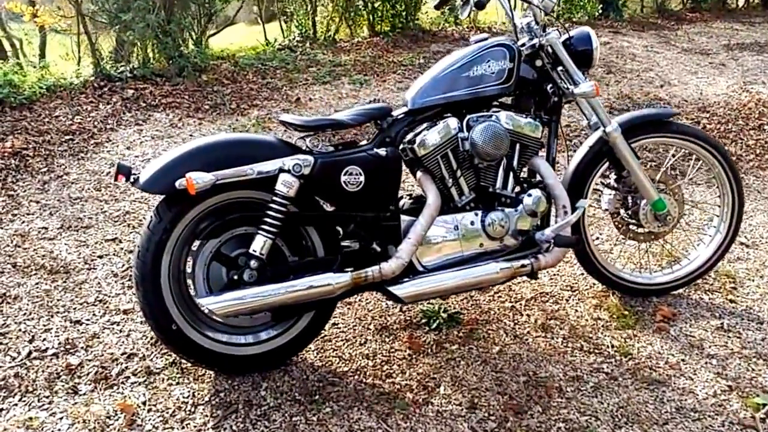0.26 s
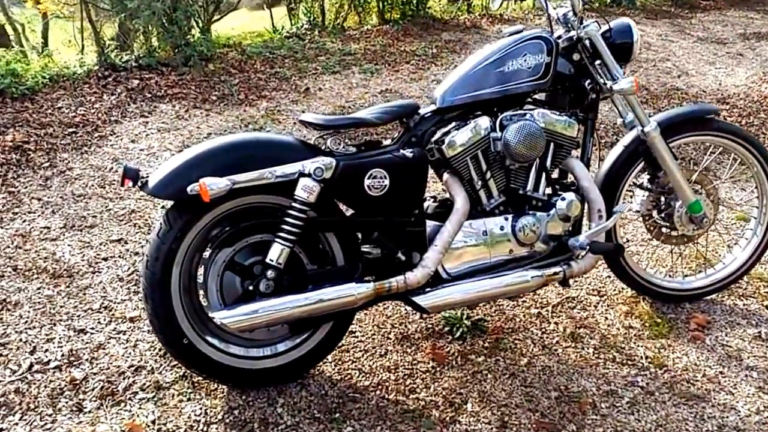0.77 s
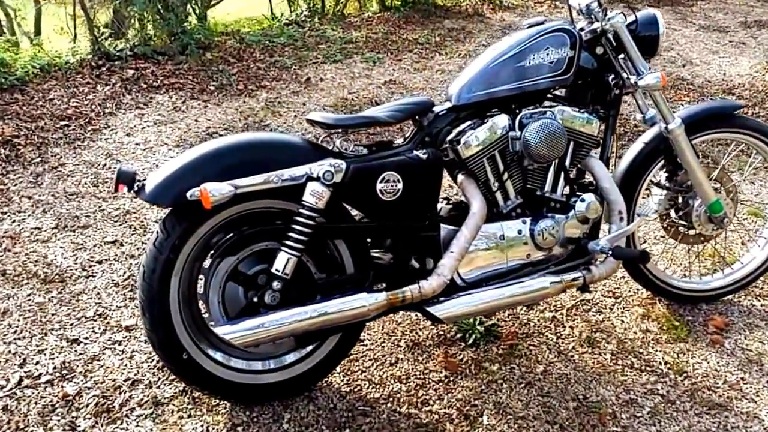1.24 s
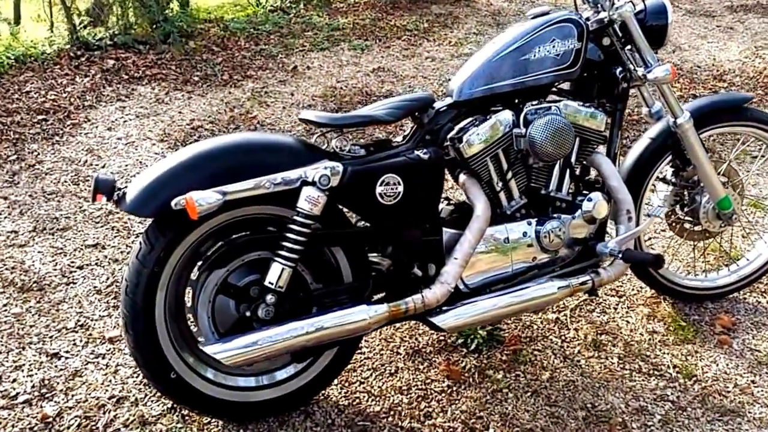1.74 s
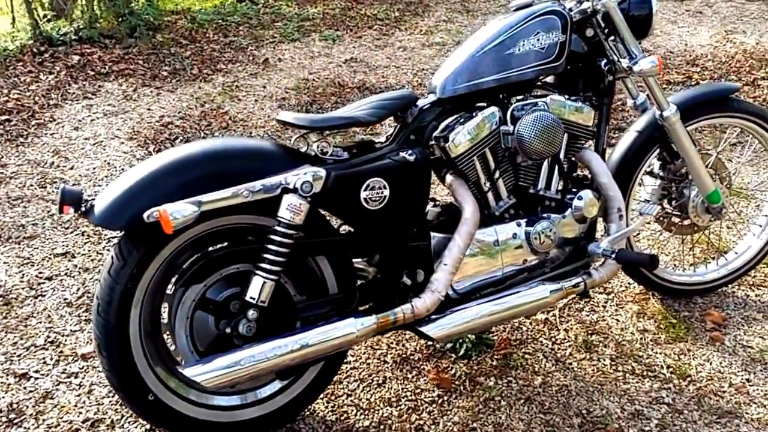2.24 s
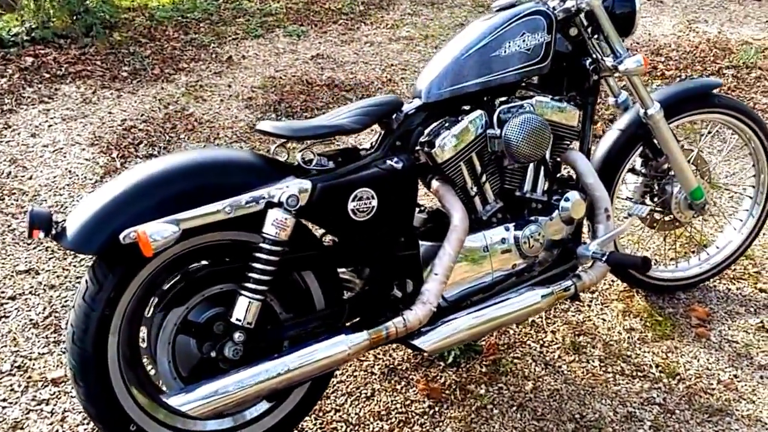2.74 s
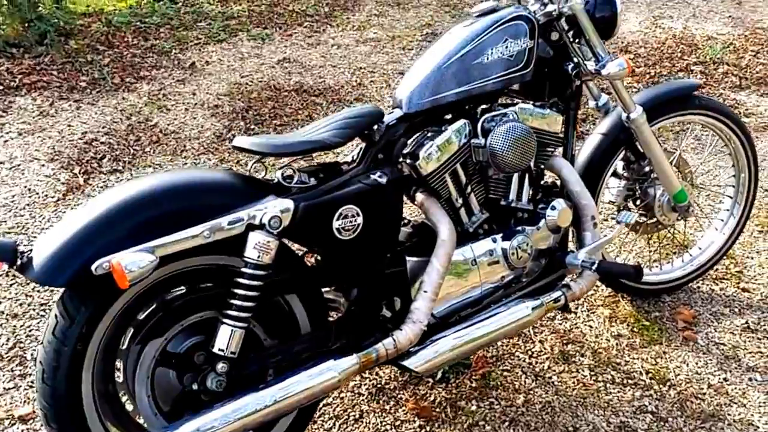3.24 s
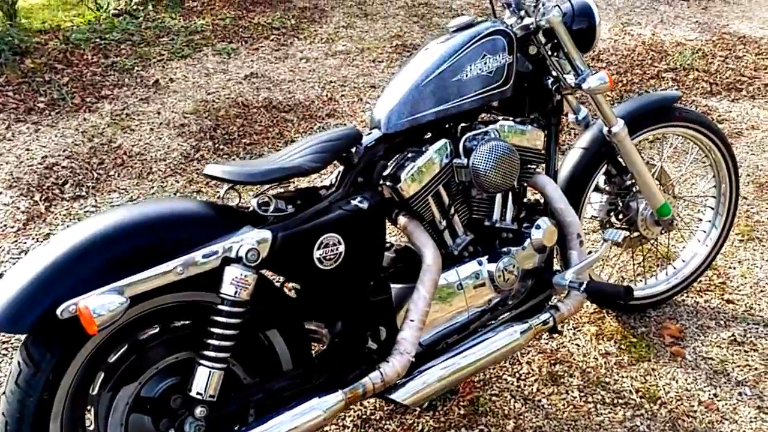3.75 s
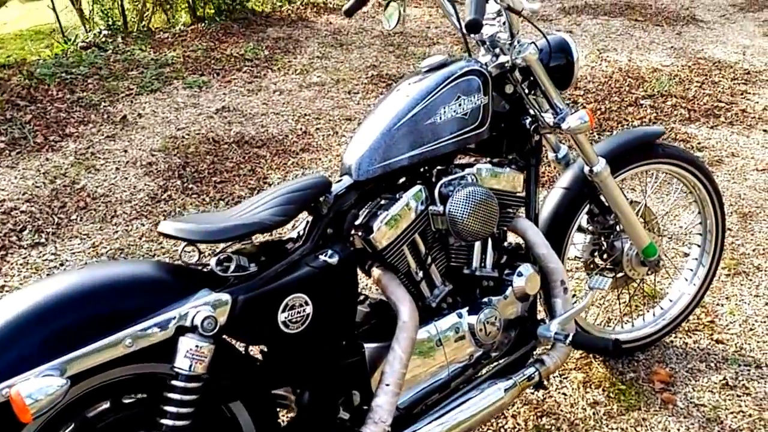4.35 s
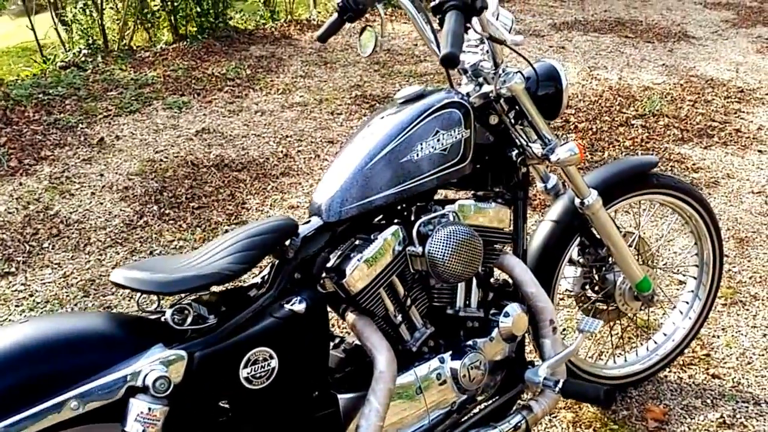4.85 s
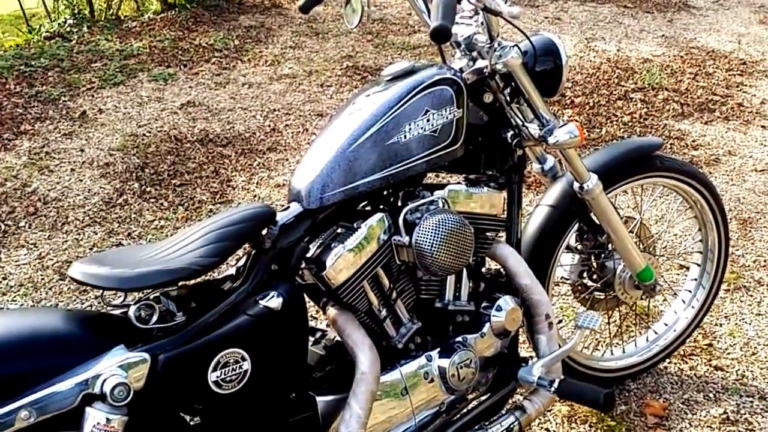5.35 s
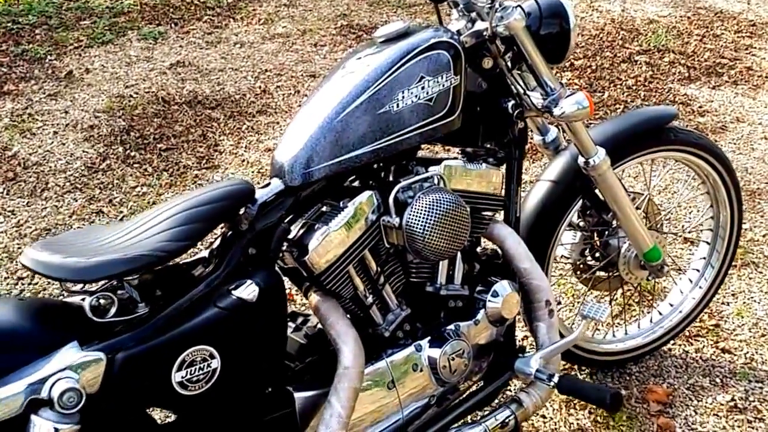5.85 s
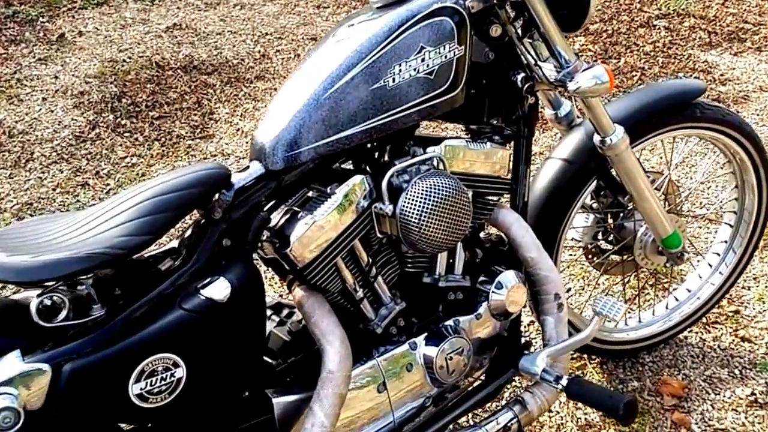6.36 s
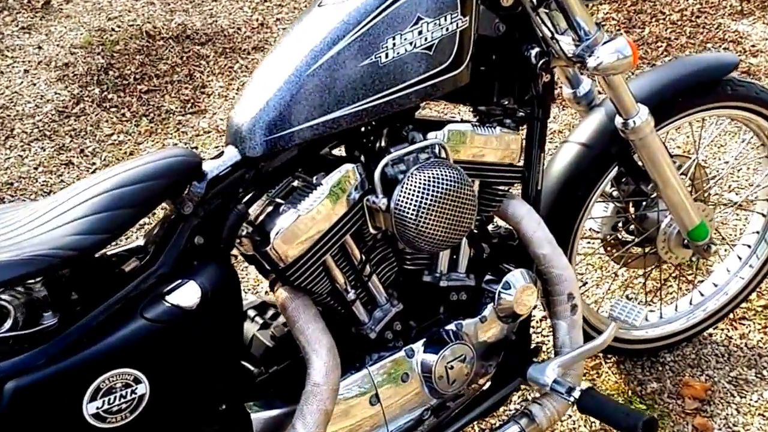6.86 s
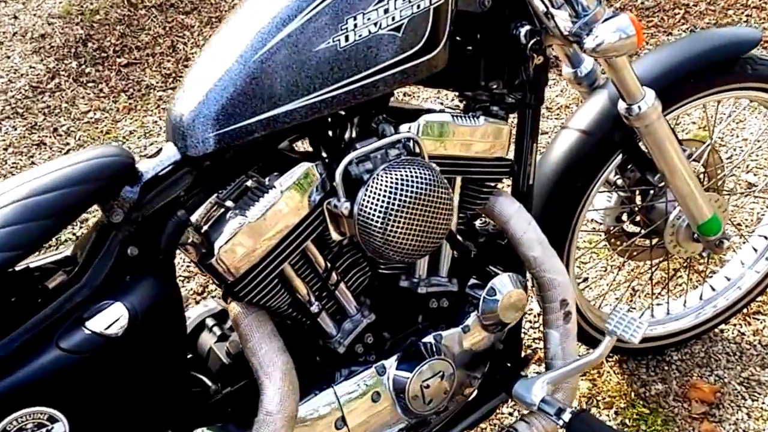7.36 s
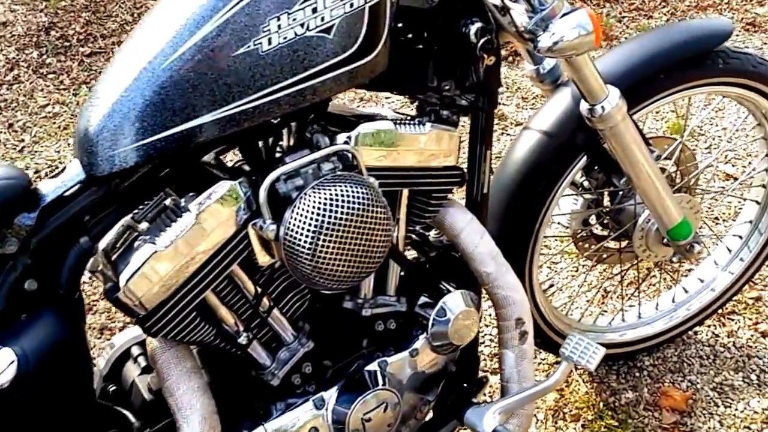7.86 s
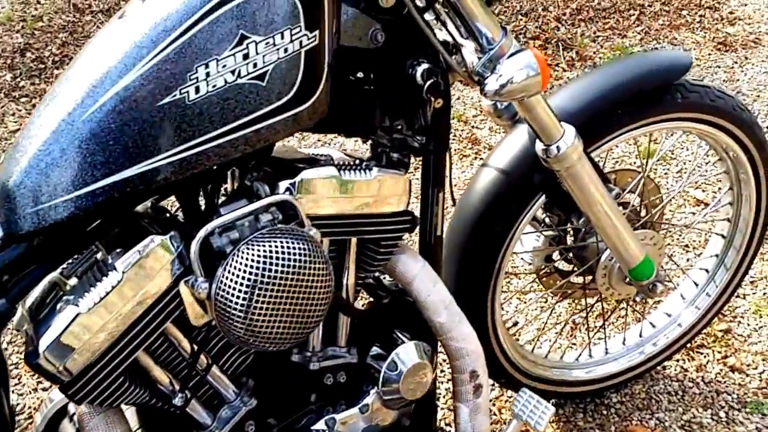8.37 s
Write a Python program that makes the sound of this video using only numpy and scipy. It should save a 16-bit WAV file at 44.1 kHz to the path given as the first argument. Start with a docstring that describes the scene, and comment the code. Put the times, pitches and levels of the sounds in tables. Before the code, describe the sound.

A V-twin motorcycle idles outdoors for the whole eight and a half seconds, with a deep, uneven, loping beat. Strong firings come singly or in clusters of two or three, with weak puffs and a low rolling rumble between them. At first the sound is heard from behind the tailpipes, where each strong thump carries a throaty bark and a short, bright spit of hiss. Valves tick and gears whirr quietly between the beats, with a faint whine. The listener moves forward, and from about 3 seconds light metallic pings emerge, clearer by 5 seconds. Between about 6 and 8 seconds the exhaust hiss falls away and the thumps turn rounder, while the engine's whirr and sizzle come close, strongest around 8 seconds. The idle speed holds to the end. Throughout, the left microphone is muffled and the biggest beats overload the right one.

```python
"""A V-twin motorcycle idles with an uneven, loping beat, heard first from behind the tailpipes.
Every firing thumps the air in the pipes; strong ones bark and spit a hissing jet, weak ones barely puff.
Valve gear ticks and whirrs between the beats. As the listener walks forward the rockers start to ping,
then the jets fall away and the engine's whirr and sizzle come close.
Throughout, the left microphone is muffled and the big beats overload the right one."""
import sys
import numpy as np
from scipy import signal
from scipy.fft import rfft, irfft, next_fast_len
from scipy.io import wavfile
from scipy.ndimage import uniform_filter1d, map_coordinates

SR = 44100
rng = np.random.default_rng(int(sys.argv[2]) if len(sys.argv) > 2 else 0)


def master_out(mix):
    """Clip the mix to full scale and print it as 16-bit PCM to the path in sys.argv[1]."""
    frames = np.transpose(np.atleast_2d(mix))
    ceiling = np.clip(frames, -1, 1)
    pcm = np.round(ceiling * 32767).astype(np.int16)
    wavfile.write(sys.argv[1], SR, pcm)


N = 379701


def amp(db):
    """Decibels to gain."""
    return 10 ** (np.asarray(db) / 20)


def unit(x):
    """x scaled to rms 1."""
    return x / np.sqrt(np.mean(x ** 2) + 1e-20)


def eq_gain(points, hz):
    """Gain at hz of an EQ curve drawn through (frequency [Hz], level [dB]) on a log axis."""
    point_hz, db = np.transpose(points)
    return amp(np.interp(np.log(hz + 1), np.log(point_hz + 1), db))


def curves(rows):
    """Automation lanes: one value per sample for each column after the time."""
    times, *columns = np.transpose(rows)
    return [np.interp(np.arange(N) / SR, times, column) for column in columns]


def wobble(rate):
    """A smooth random curve, rate knots a second."""
    knots = rng.standard_normal(int(N * rate / SR) + 4)
    return map_coordinates(knots, [np.arange(N) * rate / SR])


def filtered(x, response):
    """x through a filter given as a complex response of frequency."""
    size = next_fast_len(N + SR // 2)
    return irfft(rfft(x, size) * response(np.fft.rfftfreq(size, 1 / SR)), size)[..., :N]


def resonances(modes, f):
    """Response of a row of modes, neighbours swinging in opposite senses."""
    return sum(-(-1) ** k * amp(db) * 1j * f * width / (hz * hz - f * f + 1j * f * width)
               for k, (hz, width, db) in enumerate(modes))


def strikes(times, sizes, shape):
    """One copy of shape at each time; a strike just before the start rings on into it."""
    train = np.zeros(N + 2 * SR)
    np.add.at(train, np.round(times * SR).astype(int) + SR, sizes)
    return signal.fftconvolve(train, shape)[SR:SR + N]


def puff(at, width):
    """A bell-shaped envelope centred `at` seconds after its trigger."""
    t = np.arange(SR // 4) / SR
    return np.exp(-.5 * ((t - at) / width) ** 2)


def fade(at, rise, t60):
    """An envelope that opens `at` seconds after its trigger and dies away."""
    t = np.maximum(np.arange(SR // 4) / SR - at, 0)
    return (1 - np.exp(-t / rise)) * amp(-60 * t / t60)


def rush(colour, alike, patchy_db):
    """Stereo turbulence of rms 1 whose colour flickers by patchy_db; alike is left-right correlation."""
    spectra = signal.stft(rng.standard_normal((2, N)), nperseg=512)[2]
    patches = uniform_filter1d(rng.standard_normal(spectra.shape[1:]), size=7, axis=0)
    patches = unit(uniform_filter1d(patches, size=8, axis=1))
    noise = signal.istft(spectra * amp(patchy_db * patches), nperseg=512)[1][:, :N]
    mid, side = filtered(noise, colour)
    spread = np.arccos(alike) / 2
    return unit(np.cos(spread) * mid + np.sin(spread) * np.array([side, -side]))


def firings(turn_s=0.079, v_degrees=45, kick_s=0.00407, stall_db=1.66, chance_db=1, hiss_slope=1.76):
    """The cylinders fire in turn, weakly between beats. Returns (time [s], pressure [dB], hiss [dB])."""
    # firings that catch fully and stand out as beats: (time [s], pressure [dB])
    beats = [(-0.025, -5.5), (0.038, -9), (0.289, -3.5), (0.354, 0), (0.591, -1), (0.746, -4), (0.815, 1.5),
             (0.901, -1), (1.063, -2.5), (1.233, -1.5), (1.302, 1), (1.383, -1.5), (1.539, -2.5),
             (1.706, -1), (1.772, 2), (2.022, 1), (2.248, 1), (2.326, 0.5), (2.637, 0.5), (2.7, 1),
             (2.928, 0.5), (3.082, -2.5), (3.15, 2.5), (3.229, -3), (3.383, -3.5), (3.552, -1), (3.619, 2),
             (3.855, -1.5), (4.013, -3.5), (4.085, 0.5), (4.164, 1), (4.493, 2), (4.557, -0.5), (4.807, 0),
             (4.959, -5.5), (5.029, 1), (5.11, 0), (5.45, 2), (5.512, 0.5), (5.76, 1.5), (5.916, -1),
             (5.984, 3), (6.06, 1), (6.384, 0), (6.453, 4), (6.687, -0.5), (6.846, -0.5), (6.917, 2.5),
             (6.997, 0.5), (7.222, -3), (7.318, 1.5), (7.55, -1), (7.642, 1.5), (7.984, 1), (8.048, 2.5),
             (8.282, 0.5), (8.436, -2), (8.507, -0.5), (8.587, -2.5)]
    # a firing that barely catches: (time [s], pressure [dB])
    misfire = [(0, -24.5), (0.7, -13.5), (4.4, -14.5), (6.5, -8.5), (8.6, -15.5)]
    # each pipe's jet drops once the listener has passed its mouth: (time [s], relative hiss [dB])
    front_mouth = [(0, -13), (3.3, -14.5), (5.5, -14), (7.3, -16), (7.7, -20), (8.6, -30)]
    rear_mouth = [(0, -11.5), (3.6, -14), (5, -15), (6, -23.5), (7.5, -23.5), (8.05, -32), (8.6, -20.5)]
    beat_s, beat_db = np.transpose(beats)
    turns_apart = np.round(np.diff(beat_s) / turn_s)  # one firing per crank turn
    beat_turn = 1 + np.append(0, np.cumsum(turns_apart)).astype(int)
    turn = np.arange(1, beat_turn[-1] + 1)
    rear = turn % 2 == 0
    crank = turn - rear * v_degrees / 360  # the V angle makes the rear cylinder fire early
    times = np.interp(crank, crank[beat_turn - 1], beat_s)
    last_beat = np.searchsorted(beat_turn, turn, side="right") - 1
    turns_since = turn - beat_turn[last_beat]
    times -= kick_s * (turns_since == 1)  # a beat speeds the crank: the weak firing after it is early
    misfire_db = np.interp(times, *np.transpose(misfire))
    carry = np.where(rear, 0.48, 0.19)  # share of a cylinder's last strength that a weak firing keeps
    luck_db = chance_db * rng.standard_normal(len(times))
    pressure_db = beat_db[last_beat]
    for k in np.flatnonzero(turns_since):
        kept_db = carry[k] * (pressure_db[k - 2] - misfire_db[k]) if k >= 2 else 0
        lost_db = stall_db * (turns_since[k] - 1)
        pressure_db[k] = misfire_db[k] + kept_db - lost_db + luck_db[k]
    front_db = np.interp(times, *np.transpose(front_mouth))
    rear_db = np.interp(times, *np.transpose(rear_mouth))
    hiss_db = np.where(rear, rear_db, front_db) + hiss_slope * pressure_db
    return times, pressure_db, hiss_db


def thump(times, pressure_db, gain_db=58, low_cut_hz=30, deep_count=6):
    """Each slug of gas sets the air in the pipes swinging: deep modes, and overtones that beam."""
    # air columns of the exhaust: (frequency [Hz], width [Hz], level [dB])
    pipes = [(59.7, 18.13, -5), (78.8, 20.46, 0), (96.37, 8.5, 2), (105.5, 18.5, -12), (111.9, 4.2, -4.5),
             (155, 30.3, -28.5), (196.3, 27.2, -17), (218.4, 12, -13), (293.4, 33, -33.5), (375, 26, -77)]
    # the overtones beam backwards, so they fade as the listener walks forward: (time [s], level [dB])
    beam = [(0, 2), (2.5, -0.5), (5, -0.5), (7, -4), (8.6, -11)]
    beam_db, = curves(beam)
    f = np.fft.rfftfreq(SR, 1 / SR)
    radiated = (1j * f / (1j * f + low_cut_hz)) ** 2
    slugs = amp(pressure_db + gain_db)
    deep, overtones = [strikes(times, slugs, irfft(resonances(modes, f) * radiated)[:SR // 2])
                       for modes in (pipes[:deep_count], pipes[deep_count:])]
    return deep + amp(beam_db) * overtones


def bark(times, pressure_db, gain_db=-17, echo_db=-9, scatter_db=-11, steepness=1.74):
    """The exhaust valve cracks open; the crack returns down the pipe and scatters round the yard."""
    # throaty midrange of the crack: (frequency [Hz], level [dB])
    tone = [(200, -5.5), (330, 2.5), (480, -6), (620, 2), (850, 2.5), (1050, -6.5), (1350, -12),
            (2200, -14), (4000, -20.5)]
    crack = fade(at=0.0022, rise=0.00087, t60=0.09)
    echo = amp(echo_db) * puff(at=0.017, width=0.0047)
    scatter = amp(scatter_db) * fade(at=0.0078, rise=0.0031, t60=0.55)
    sizes = amp(steepness * pressure_db + gain_db)
    power = strikes(times, sizes ** 2, crack ** 2 + echo ** 2 + scatter ** 2)
    return np.sqrt(np.abs(power)) * rush(lambda f: eq_gain(tone, f), alike=0.22, patchy_db=2.37)


def jet(times, hiss_db, gain_db=4, after_db=-16, scatter_db=-28):
    """Gas tears out of the pipe's mouth at the height of the blow-down, then spits again, weaker."""
    # bright hiss of the escaping gas: (frequency [Hz], level [dB])
    tone = [(500, -8), (1100, -1.5), (1500, -5.5), (2200, -14), (2800, 0.5), (3500, -9), (5200, -7),
            (7000, 1), (9000, 1.5), (11000, 1.5), (14000, -8.5)]
    blow = fade(at=0.0037, rise=0.001, t60=0.093) * puff(at=0.0083, width=0.003)
    spit = amp(after_db) * fade(at=0.0148, rise=0.00041, t60=0.032)
    scatter = amp(scatter_db) * fade(at=0.0052, rise=.003, t60=0.05)
    power = strikes(times, amp(hiss_db + gain_db) ** 2, blow ** 2 + spit ** 2 + scatter ** 2)
    ragged = unit(amp(3.4 * wobble(900)))
    return np.sqrt(np.abs(power)) * ragged * rush(lambda f: eq_gain(tone, f), alike=0.42, patchy_db=4.0)


def murmur(times, pressure_db, steady_db=-29, after_db=-18):
    """Gas left in the pipes sloshes on after each firing and joins the beats into a rolling lope."""
    # low resonances of ground and pipes: (frequency [Hz], width [Hz], level [dB])
    modes = [(75, 52, -1), (106.9, 24, -3.5), (156, 19, -14), (210.4, 43, -6), (295, 12, -17)]
    slosh = fade(at=0.023, rise=0.002, t60=1.0)
    power = amp(steady_db) ** 2 + strikes(times, amp(pressure_db + after_db) ** 2, slosh ** 2)
    rumble = rush(lambda f: sum(np.abs(resonances([mode], f)) ** 2 for mode in modes),
                  alike=0.82, patchy_db=.5)
    return np.sqrt(np.abs(power)) * rumble


def valve_gear(times, close_db=4, open_db=-1, spread_db=3):
    """Envelope of the mechanism: tappets tick twice after each firing over a constant churn."""
    chance = rng.standard_normal((len(times), 4))
    tick = fade(at=0, rise=.0003, t60=.035)
    closing = strikes(times + 0.051 + 0.0013 * chance[:, 0], amp(close_db + spread_db * chance[:, 1]), tick)
    opening = strikes(times + 0.043 + 0.00495 * chance[:, 2], amp(open_db + spread_db * chance[:, 3]), tick)
    return (1 + closing + opening) * amp(1.7 * wobble(400))


def engine(times, casing_gain_db=3, whine_hz=1810, whine_width_hz=22):
    """Cams, gears and chain whirr in the casing and ring its metal; one gear mesh whines faintly."""
    # the casing swells as the listener nears it: (time [s], whirr [dB], sizzle [dB])
    approach = [(0, -51, -50), (1.2, -44, -52.5), (4.4, -43.5, -48), (7.2, -38, -43), (8.1, -35, -37.5),
                (8.6, -36, -37.5)]
    # engine parts heard along the way: (time [s], gear whine [dB], metal ring [dB])
    gears = [(0, -71, -46), (1.4, -52.5, -50), (3.5, -49, -45.5), (5.2, -48, -50.5), (6.2, -62, -44.5),
             (7.2, -48, -46.5), (8.6, -52, -46)]
    # the casing's dark whirr and its bright sizzle: (frequency [Hz], level [dB])
    whirr_tone = [(120, 14.5), (300, 8), (520, 11.5), (780, 7), (980, 8.5), (1250, 4), (1550, 4.5),
                  (2250, -7), (2700, 2.5), (3400, 0), (4600, -6), (7000, -50)]
    sizzle_tone = [(3500, -16), (5200, -9), (5700, -1.5), (6400, -6.5), (7700, 0.5), (8600, -0.5),
                   (10000, -0.5), (14000, -8)]
    # metal parts that the valve gear rings: (frequency [Hz], width [Hz], level [dB])
    metal = [(933, 16, 20.5), (1464, 82, -13), (2660, 110, 4), (5900, 130, -40), (7900, 330, 1.5),
             (8740, 210, -10.5)]
    whirr_db, sizzle_db = curves(approach)
    whine_db, ring_db = curves(gears)
    whirr = rush(lambda f: eq_gain(whirr_tone, f), alike=.6, patchy_db=.8)
    sizzle = rush(lambda f: eq_gain(sizzle_tone, f), alike=.3, patchy_db=.8)
    ring = rush(lambda f: resonances(metal, f), alike=.5, patchy_db=1)
    whine = rush(lambda f: resonances([(whine_hz, whine_width_hz, 0)], f), alike=.8, patchy_db=0)
    casing = amp(casing_gain_db) * (amp(whirr_db) * whirr + amp(sizzle_db) * sizzle)
    return valve_gear(times) * casing + valve_gear(times) * amp(ring_db) * ring + amp(whine_db) * whine


def rockers(times, after_s=0.004, jitter_s=0.0062, spread_db=3):
    """Each exhaust valve is knocked open by its rocker, which pings briefly."""
    # modes of the rocker gear: (frequency [Hz], level [dB], t60 [s])
    modes = [(1500, -7, 0.05), (1980, 2, 0.05), (2680, 6, 0.086), (2720, -8, 0.08)]
    # the pings come up beside the cylinder heads: (time [s], level [dB])
    heads = [(0, -60), (3, -45), (5.2, -37), (6.3, -37), (7.3, -36), (8.6, -39)]
    chance = rng.standard_normal((len(times), len(modes) + 1))
    t = np.arange(SR // 4) / SR
    knocks = times + after_s + jitter_s * chance[:, -1]
    pings = np.zeros(N)
    for k, (hz, db, t60) in enumerate(modes):
        ping = fade(at=0, rise=.0015, t60=t60) * np.sin(2 * np.pi * hz * t)
        pings += strikes(knocks, amp(db + spread_db * chance[:, k]), ping)
    near_db, = curves(heads)
    return amp(near_db) * pings


def scene():
    """Exhaust and engine as they reach the two microphones."""
    # the exhaust on the left, relative to the right: (time [s], level [dB])
    bearing = [(0, -4), (2.5, -1), (6, 0), (8.6, 0.5)]
    left_db, = curves(bearing)
    times, pressure_db, hiss_db = firings()
    lows = thump(times, pressure_db) + murmur(times, pressure_db)
    exhaust = lows + bark(times, pressure_db) + jet(times, hiss_db)
    return exhaust * amp([left_db, np.zeros(N)]) + engine(times) + rockers(times)


def record(dry, lag_s=.00013, top_hz=14400):
    """The left microphone hears late and dull; the loudest beats flatten against full scale."""
    # the muffled left microphone, relative to the right: (frequency [Hz], level [dB])
    left_mic = [(100, -8), (250, -6), (500, -8.5), (900, -13.5), (1500, -1.5), (1900, 0.5), (2700, -8.5),
                (4000, 3), (5300, -1), (7000, -16), (9000, -22.5), (14000, -19.5)]
    left = filtered(dry[0], lambda f: eq_gain(left_mic, f) * np.exp(-2j * np.pi * f * lag_s))
    pair = np.array([left, dry[1]])
    clipped = pair / (1 + np.abs(pair) ** 10) ** (1 / 10)
    return filtered(clipped, lambda f: 1 / np.sqrt(1 + (f / top_hz) ** 120))  # steep high cut


dry = scene()
out = record(dry)
master_out(out)
```